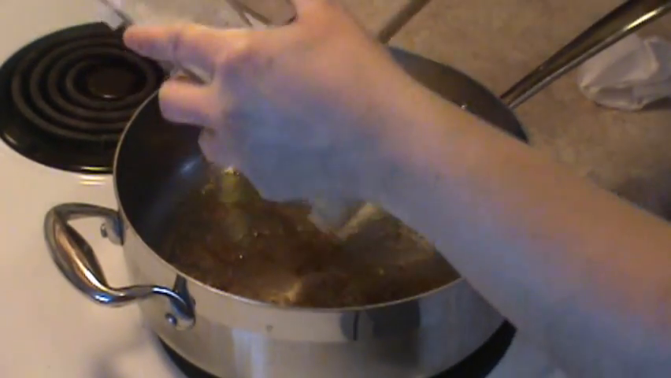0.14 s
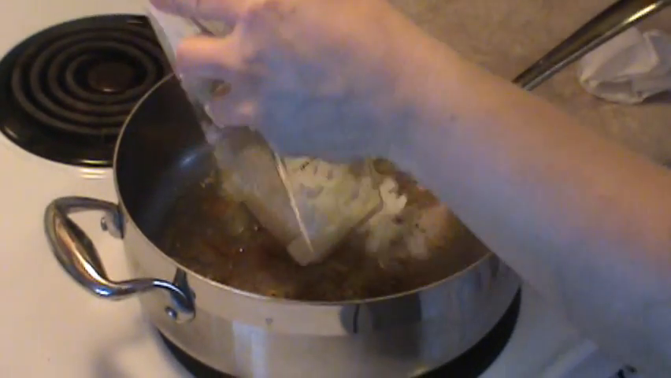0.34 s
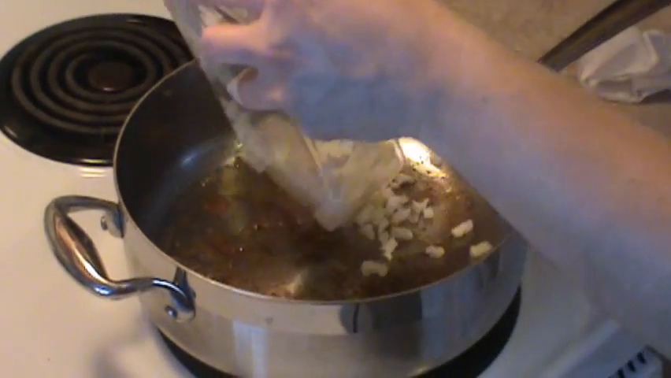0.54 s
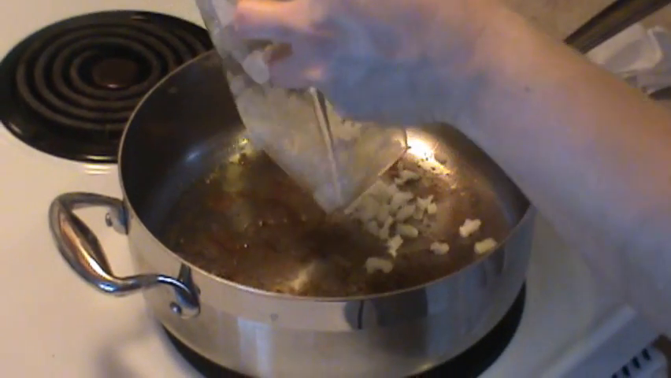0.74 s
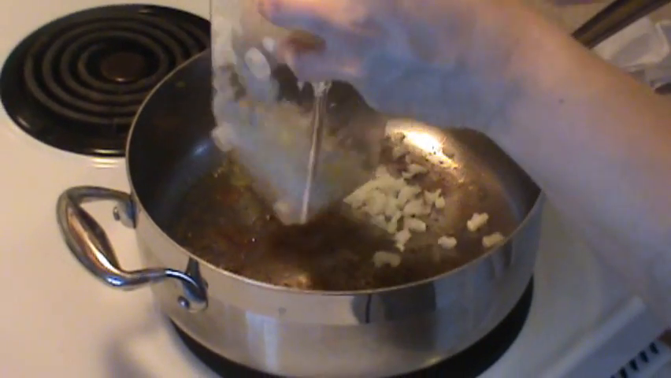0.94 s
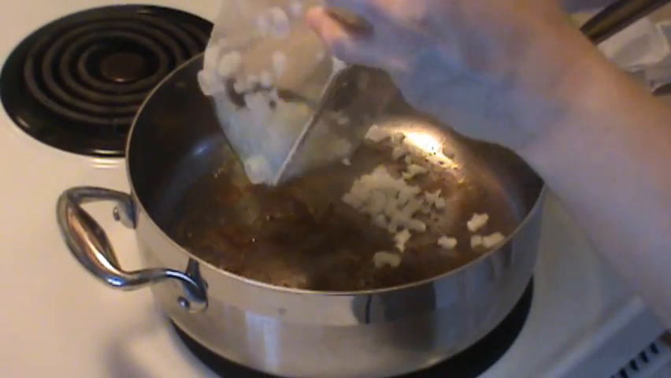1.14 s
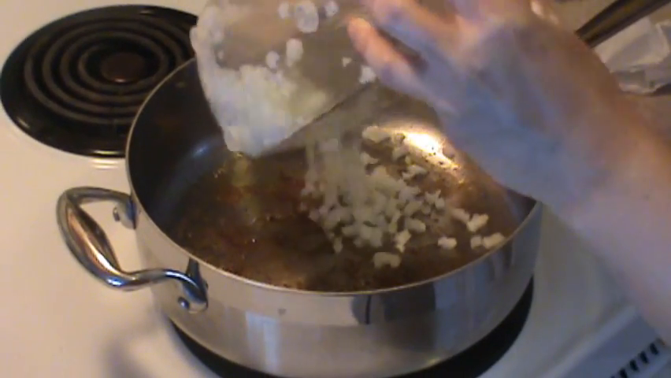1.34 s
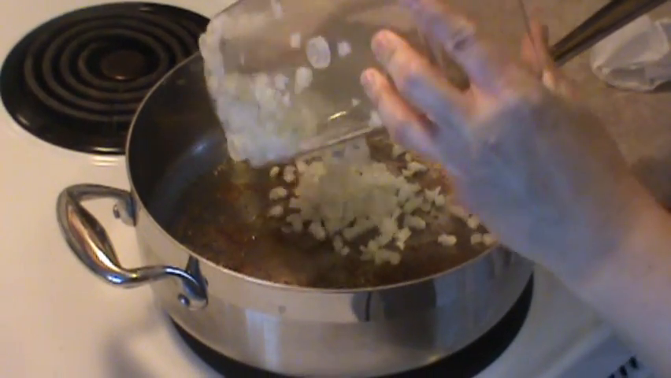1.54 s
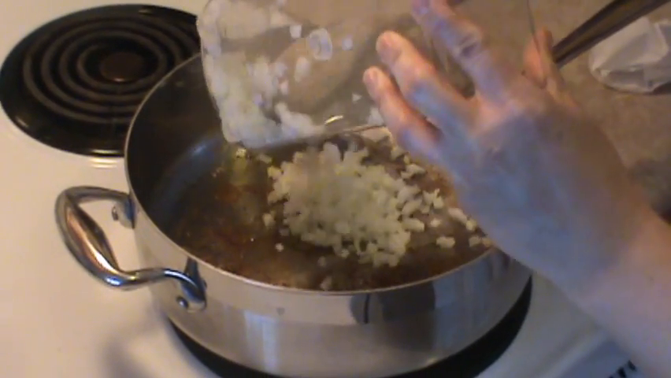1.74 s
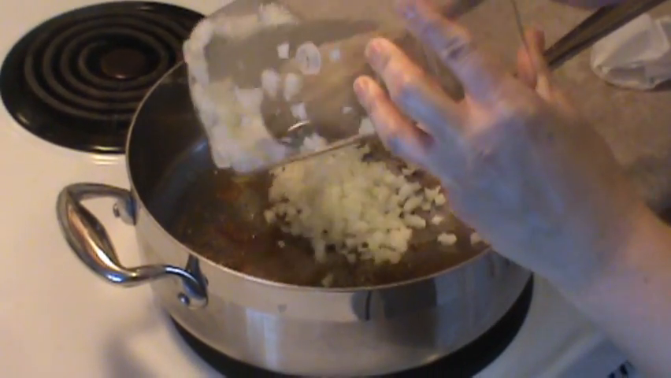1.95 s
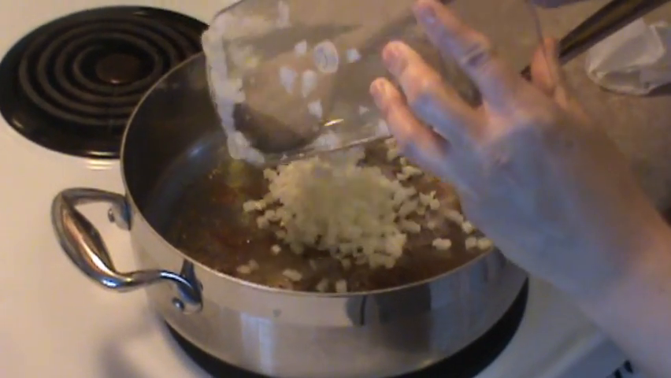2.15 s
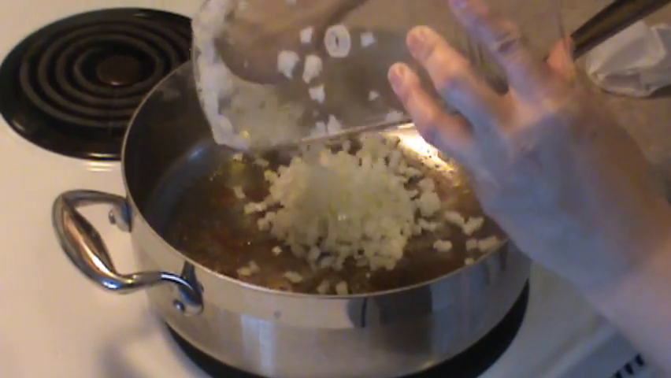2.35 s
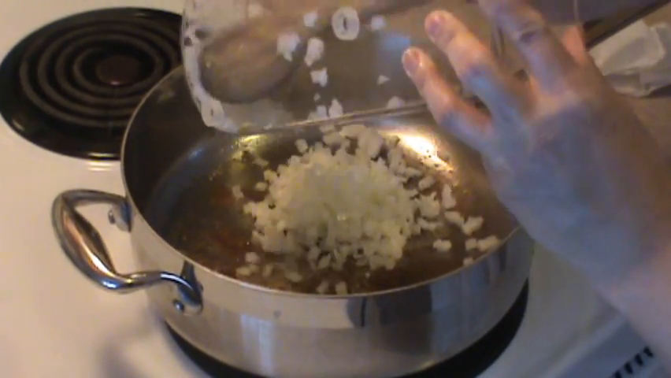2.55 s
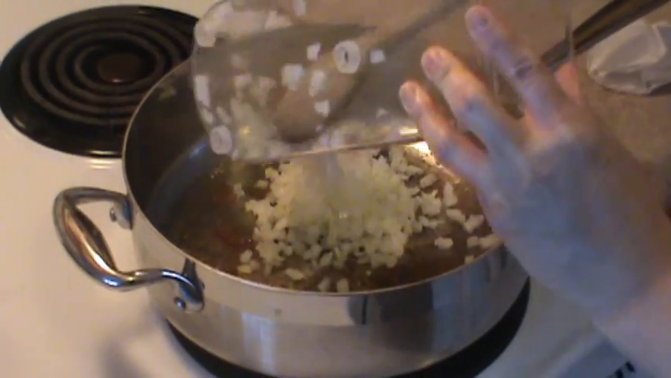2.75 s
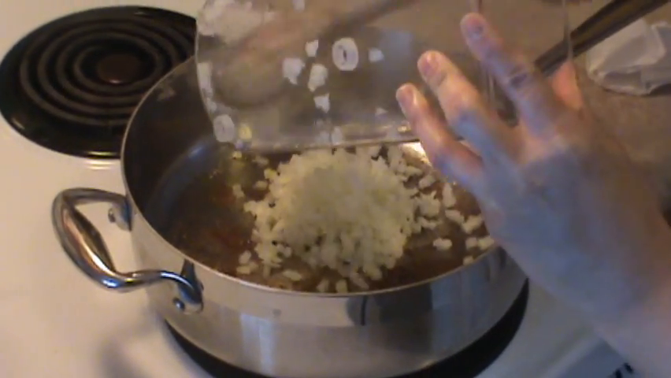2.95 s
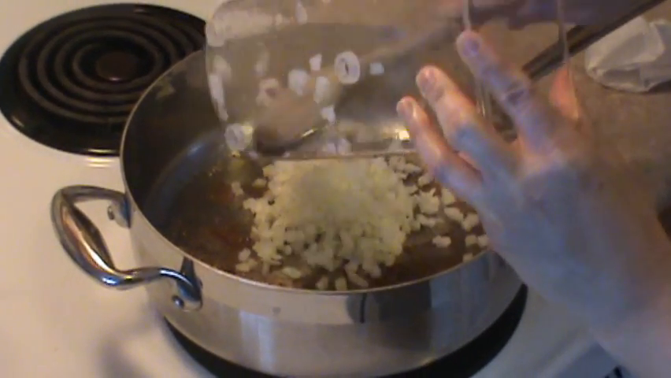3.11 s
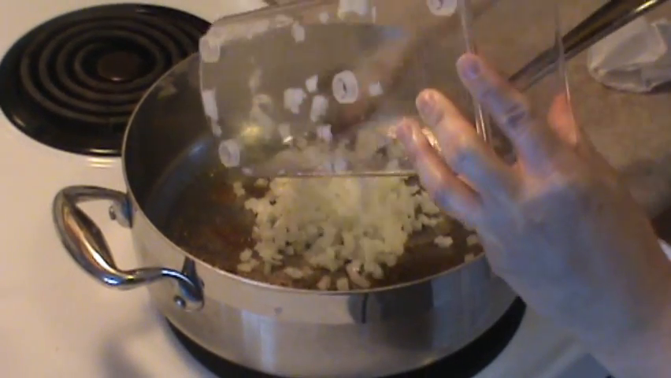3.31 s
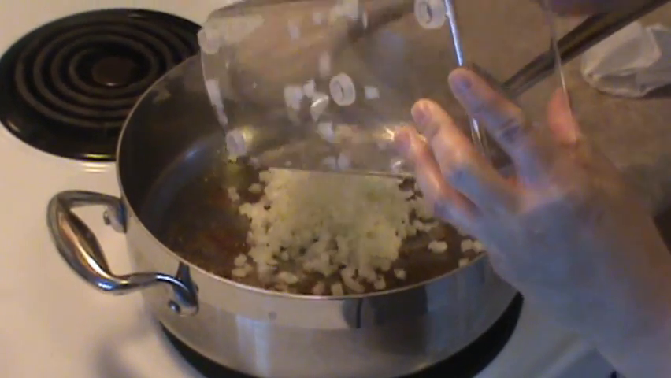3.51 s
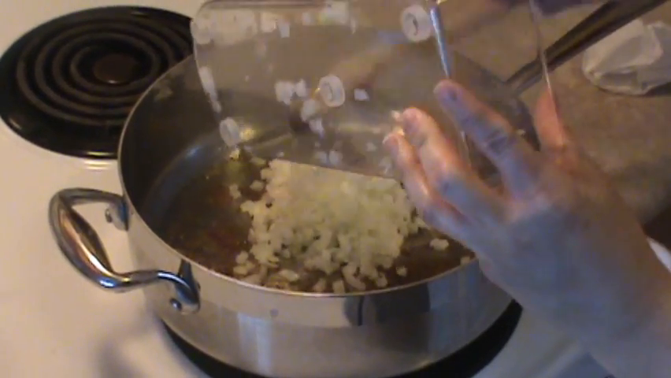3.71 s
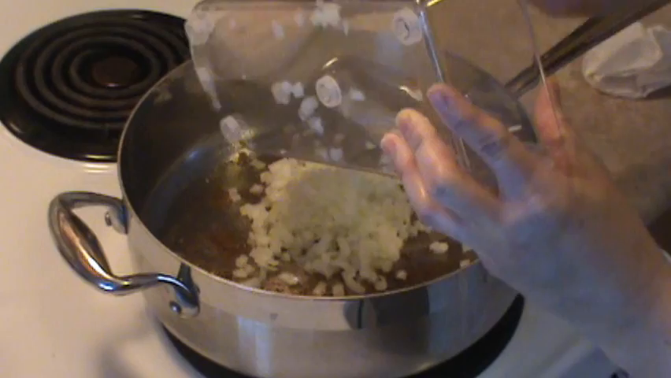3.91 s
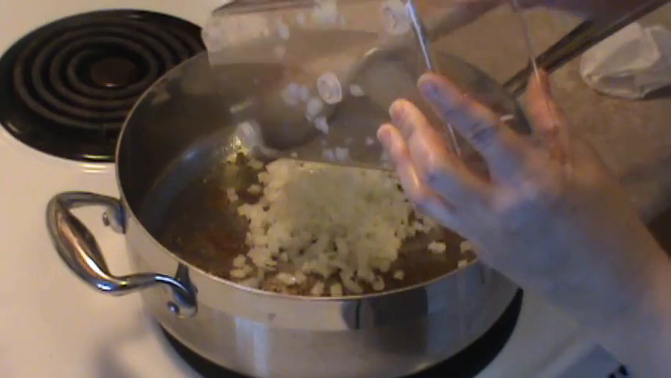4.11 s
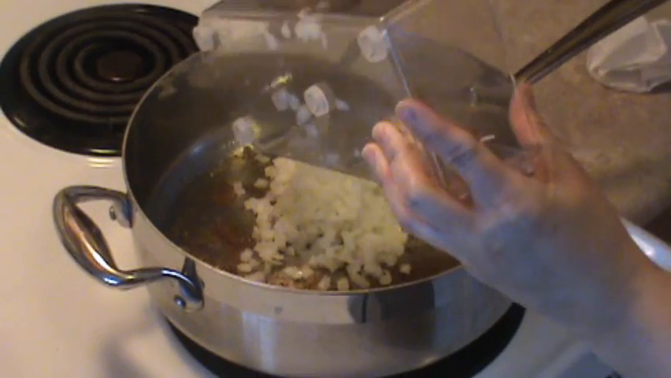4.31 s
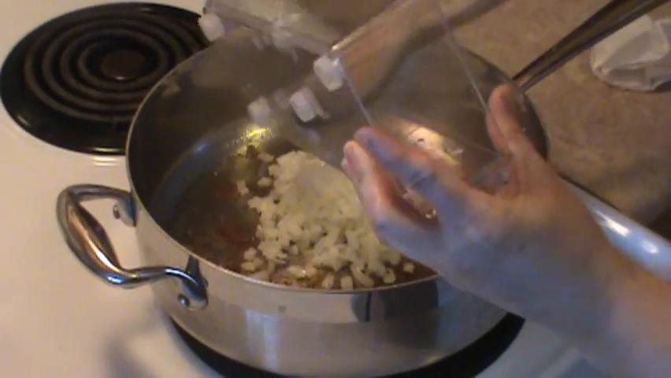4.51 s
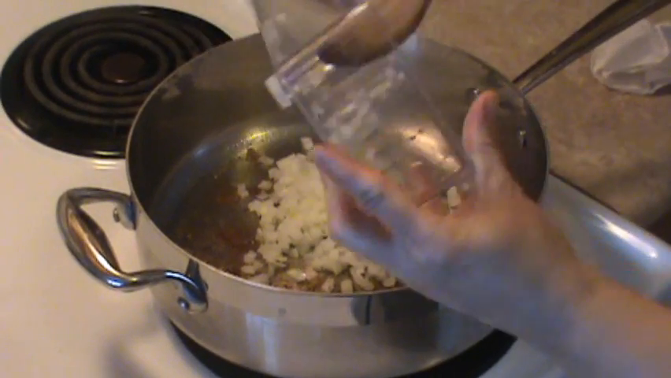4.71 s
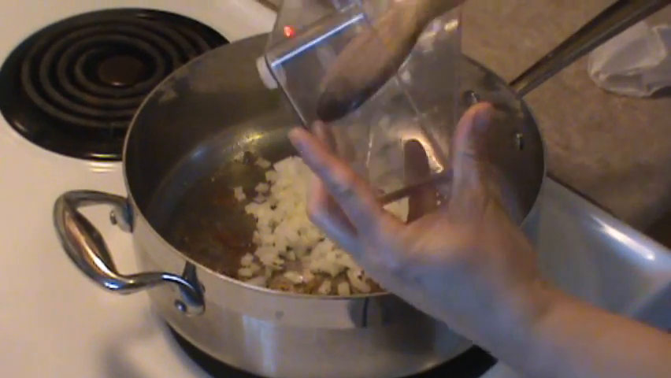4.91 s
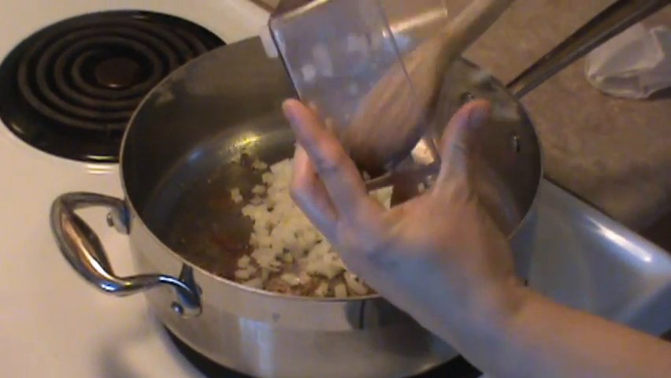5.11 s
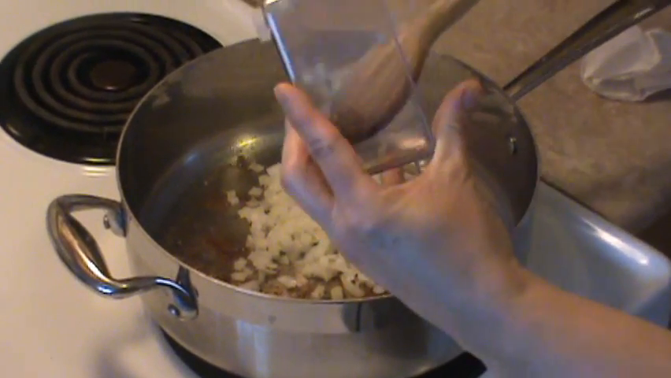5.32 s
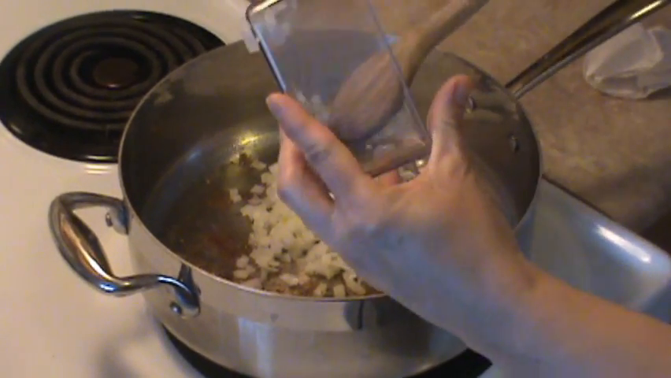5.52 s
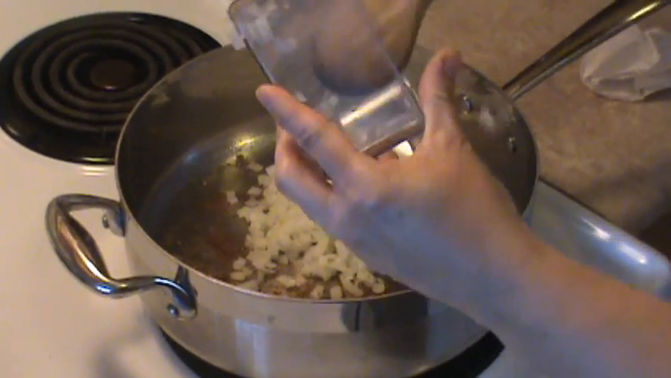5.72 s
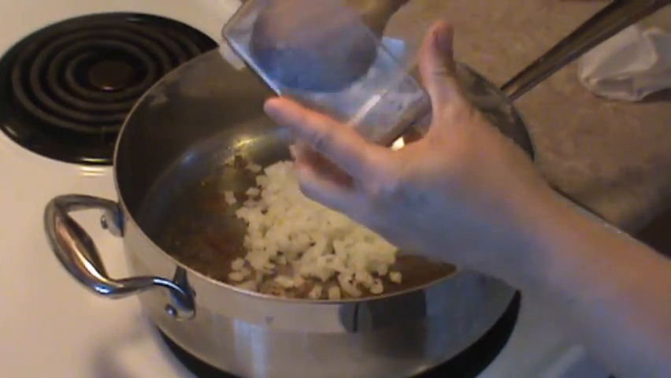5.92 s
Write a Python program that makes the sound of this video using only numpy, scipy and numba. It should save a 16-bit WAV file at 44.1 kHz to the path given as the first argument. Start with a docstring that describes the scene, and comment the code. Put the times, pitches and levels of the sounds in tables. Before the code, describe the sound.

A steady frying sizzle starts up in a steel pot, with hollow, irregular clacks of a wooden spoon in a plastic tub.

```python
"""Onions into hot oil

Chopped onions are scraped from a plastic tub into hot oil in a steel pot, in a small kitchen.
Countless steam bubbles burst into a steady sizzle, coloured by the air in the pot. A wooden spoon
knocks and rebounds in the tub, ringing its walls, with a few soft scrapes and a low room rumble.
A limiter ducks the sizzle under the loud knocks."""
import sys
import numpy as np
from scipy import signal
from scipy.fft import rfft, irfft
from scipy.io import wavfile
from scipy.ndimage import uniform_filter1d, minimum_filter1d
from numba import njit

SR = 44100
rng = np.random.default_rng(int(sys.argv[2]) if len(sys.argv) > 2 else 0)


def waveform_to_disk(signal):
    """Save audio, clipped to [-1, 1], as 16-bit WAV at the path in sys.argv[1]."""
    frames = np.transpose(np.atleast_2d(signal))
    scaled = np.clip(frames, -1, 1) * 32767
    samples = np.round(scaled).astype(np.int16)
    wavfile.write(sys.argv[1], SR, samples)


N = 267246
TIME = np.arange(N) / SR

# spectrum of the dry clack of wood on plastic: f/Hz, level/dB
CLACK_SPECTRUM = [(40, -58), (110, -20), (165, -10), (260, -14.5), (420, -6.5), (560, 0.5), (900, -1),
                  (1500, 1.5), (2400, -2), (4000, 5), (6000, 8), (9000, 1), (15000, -43)]


def undb(db):
    """Decibels to gain."""
    return 10 ** (np.asarray(db) / 20)


def unit(x):
    """Scale to rms 1."""
    return x / np.sqrt(np.mean(x ** 2))


def colour(x, points):
    """EQ through (f/Hz, level/dB) points; minimum phase keeps the attacks sharp."""
    hz, db = np.transpose(points)
    grid = np.fft.rfftfreq(4096, 1 / SR)
    curve_db = np.interp(np.log(grid + 1), np.log(hz), db)
    cepstrum = irfft(np.log(undb(curve_db)))
    cepstrum[1:len(grid) - 1] *= 2
    cepstrum[len(grid):] = 0
    impulse = irfft(np.exp(rfft(cepstrum)))
    return signal.fftconvolve(x, impulse)[:len(x)]


def wander(rate_hz):
    """Smooth random drift with a spread near 1."""
    step = int(SR / rate_hz)
    held = np.repeat(rng.standard_normal(N // step + 1), step)
    return uniform_filter1d(held, step)[:N]


def ring(t, hz, t60):
    """One damped mode."""
    return np.sin(2 * np.pi * hz * t) * undb(-60 * t / t60)


def bursts(per_s, spread_db, t60):
    """Random noise pops, most of them tiny and a few large, as mid and side."""
    happens = rng.random(N) < per_s / SR
    size = undb(spread_db * np.minimum(rng.exponential(size=N), 5))
    energy = signal.lfilter([1], [1, -undb(-120 / (t60 * SR))], happens * size ** 2)
    return unit(np.sqrt(energy) * rng.standard_normal((2, N)))


def stereo(mid, side, pan_db):
    """Mid and side to a narrow stereo image; a positive pan leans left."""
    # stereo width: f/Hz, side gain/dB
    width = [(40, -9), (75, -8.5), (140, -3), (260, -6.5), (500, -9), (1000, -10.5), (2200, -14.5),
             (4000, -14), (8000, -10.8), (12000, -9.2)]
    side = colour(side, width)
    return np.array([(mid + side) * undb(pan_db / 2), (mid - side) * undb(-pan_db / 2)])


def room_tone(level_db=-55):
    """The kitchen's low steady rumble and faint hiss."""
    # spectrum of the quiet kitchen: f/Hz, relative level/dB
    spectrum = [(25, -8), (50, -18), (66, 1), (82, 7), (100, -4), (125, -5.5), (200, -8), (500, -0.5),
                (1000, -0.5), (3000, -7), (7000, -15), (10000, -14), (15800, -21)]
    mid, side = (undb(level_db) * unit(colour(rng.standard_normal(N), spectrum)) for _ in range(2))
    return stereo(mid, side, pan_db=1)


def kitchen_echo(x, t60=0.48, build_s=0.0052, early_t60=0.09, early_db=3):
    """Quick reflections from pot and stove, then the kitchen's longer tail; new on every call."""
    t = TIME[:len(x)]
    fade = undb(-60 * t / t60) + undb(early_db - 60 * t / early_t60)
    tail = rng.standard_normal(len(t)) * fade * (1 - np.exp(-t / build_s))
    return signal.fftconvolve(x, tail / np.linalg.norm(tail))[:len(x)]


def scrapes(resonance_q=14, grit_db=-10):
    """Rubbing swells and fades; its tiny slips, softened by the oil, keep one resonance ringing."""
    # rubs of tub on pot and spoon in tub: centre t/s, half length/s, resonance f/Hz, level/dB
    rubs = [(0.346, 0.022, 585, -48.5), (0.362, 0.012, 2280, -46), (0.505, 0.036, 940, -46.5),
            (0.595, 0.044, 950, -50), (1.292, 0.075, 910, -49.5), (5.462, 0.022, 600, -50)]
    slips = bursts(per_s=2000, spread_db=2, t60=0.004)
    slips = signal.sosfilt(signal.butter(3, 3200, fs=SR, output="sos"), slips)
    grit = unit(np.array([colour(x, CLACK_SPECTRUM) for x in slips]))
    out = np.zeros((2, N))
    for centre_s, half_s, hz, db in rubs:
        tone = unit(signal.lfilter(*signal.iirpeak(hz, resonance_q, fs=SR), grit))
        swell = np.exp(-((TIME - centre_s) / half_s) ** 2)
        out += undb(db) * swell * (tone + undb(grit_db) * grit)
    return stereo(*out, pan_db=1)


def tub_hit(t, contact_hz, modes_db=-29, clack_db=-8, clack_t60=0.1, spot_db=2, flex=0.0169):
    """Wood clacks on plastic and rings the tub; a soft contact loses the treble."""
    # modes of the plastic tub: f/Hz, relative level/dB, t60/s
    tub_modes = [(392, -15.5, 0.029), (561.6, 1.5, 0.15), (617, 2, 0.11), (696, -4.5, 0.082),
                 (844, -10, 0.15), (908, 1.5, 0.21), (1097, 1, .14), (1185, -2, 0.14), (1366, -15, 0.038),
                 (1440, -26, 0.29), (1706, -1, 0.11), (1834, 1.5, 0.17), (2044, -7.5, 0.12),
                 (2134, 11, 0.061), (2379, 12.5, 0.04), (2460, -1, 0.13), (2546, 14.5, 0.042),
                 (3083, 3, 0.21)]
    # the spot struck decides how strongly, and which way, each mode is pushed; the grip bends its pitch
    spot = rng.standard_normal((len(tub_modes), 3))
    body = sum(np.sign(way) * undb(db + spot_db * push) * ring(t, hz * (1 + flex * bend), t60)
               for (hz, db, t60), (push, way, bend) in zip(tub_modes, spot))
    clack = colour(rng.standard_normal(len(t)) * undb(-60 * t / clack_t60), CLACK_SPECTRUM)
    softness = signal.butter(3, contact_hz, fs=SR, output="sos")
    return signal.sosfilt(softness, undb(modes_db) * body + undb(clack_db) * clack)


def wall_note(t, hz, t60=0.065, twin_ratio=1.05, twin_db=-5):
    """Opposite walls of the tub ring at slightly different pitches; the hand damps them quickly."""
    return ring(t, hz, t60) + undb(twin_db) * rng.standard_normal() * ring(t, hz * twin_ratio, t60)


def spoon_contacts(rebound_s=0.021, soften=0.81, note_lift_db=2):
    """Each stroke springs back once, in a softer contact that favours the next wall's note."""
    # spoon strokes: t/s, hit level/dB, contact cut-off f/Hz, wall note f/Hz, note level/dB,
    # rebound level against the stroke/dB, rebound note f/Hz
    strokes = [ (0, -12, 2560, 773, -11.5, -6, 1050), (0.6176, -3.5, 4600, 847, 4, -8, 862),
               (.667, -8.5, 2120, 550, 0, -21, 600), (1.352, -8.5, 5360, 1990, -6.5, -4.5, 2370),
               (1.444, -13.5, 1700, 587, -20, -18, 600), (1.9808, -5, 2420, 672, -4.5, -6, 794),
               (2.422, -3, 2820, 1230, -1, -1, 1263), (3.0195, -1, 2320, 1280, 1.5, -4, 880),
               (3.066, -2.5, 3100, 2072, -6, -12, 3040), (3.548, -5.5, 4180, 1243, -3.5, -3, 555),
               (3.991, -1, 3400, 1773, 0, -2, 910), (4.2576, -3.5, 3480, 1796, 1, -7.5, 930),
               (4.4474, -8.5, 2230, 1060, -11, -15, 596), (4.498, -.5, 2620, 671, 3.5, -2.5, 802),
               (5.0524, -3, 2030, 1060, -1.5, -5, 934), (5.186, -11, 905, 604, -10.5, -19, 890),
               (5.716, -2, 2600, 680, -3.5, -2, 880), (5.946, -10.5, 2670, 630, -7, -9.5, 1620)]
    for at_s, db, contact_hz, wall_hz, note_db, rebound_db, rebound_hz in strokes:
        yield at_s, db, contact_hz, wall_hz, note_db
        rebound_note_db = note_db + rebound_db + note_lift_db
        yield at_s + rebound_s, db + rebound_db, contact_hz * soften, rebound_hz, rebound_note_db


def spoon(wall_db=-13.5, rise_s=0.0011, turned_s=4.2, echo_mid_db=-3, echo_side_db=1):
    """The spoon knocks in the tub again and again, each hit with its wall note and its echo."""
    out = np.zeros((2, N + SR))
    t = TIME[:SR // 2]
    for at_s, db, contact_hz, wall_hz, note_db in spoon_contacts():
        knock = undb(db) * tub_hit(t, contact_hz) + undb(note_db + wall_db) * wall_note(t, wall_hz)
        knock *= 1 - np.exp(-t / rise_s)  # the wall gives way gradually
        # the small tub radiates no deep bass, and less still once it is turned away from the pot
        low_cut_hz = 125 if at_s < turned_s else 260
        knock = signal.sosfilt(signal.butter(2, low_cut_hz, "high", fs=SR, output="sos"), knock)
        mid = knock + undb(echo_mid_db) * kitchen_echo(knock)
        side = undb(echo_side_db) * kitchen_echo(knock)
        start = int(at_s * SR)
        out[:, start:start + len(t)] += [mid, side]
    return stereo(*out[:, :N], pan_db=1)


def pot(pops, covered_s=1.7):
    """The pot rings with the pops, most freely before the heap of onions covers its floor."""
    # resonances of the pot: f/Hz, bandwidth/Hz, nominal lift/dB
    resonances = [(570, 50, 4.5), (655, 35, 5), (935, 40, 4.5), (1105, 70, 5), (1620, 70, 3),
                  (1970, 90, 4.5), (2400, 50, 2.5), (2620, 55, 6), (3185, 75, 5), (4075, 50, 3.5),
                  (5750, 80, 2)]
    # spectrum of bursting bubbles: f/Hz, relative level/dB
    bubble_spectrum = [(200, -33.5), (500, -23), (900, -18.5), (1350, -19), (1700, -15.5), (2300, -11),
                       (3200, -8), (4200, -3), (5600, 0.5), (7300, -4), (9000, 0), (10700, 1), (12500, -2),
                       (15800, -11.5)]
    ringing = sum((undb(db) - 1) * signal.lfilter(*signal.iirpeak(hz, hz / width, fs=SR), pops)
                  for hz, width, db in resonances)
    openness = undb(6.5 / (1 + (TIME / covered_s) ** 8) - 0.5)
    return unit(colour(pops + openness * ringing, bubble_spectrum))


def boiling(big_at_1s_db=-2, db_per_doubling=2.15):
    """Loads flare up and dry out while bubbles grow: the sizzle's envelope and big-bubble gain in dB."""
    # onions landing in the oil: t/s, sizzle level/dB, time to spread/s, drying fade/(dB/s)
    loads = [(.433, -40.5, 0.0076, 3), (0.479, -28.5, 0.024, 1), (1.39, -24.5, 0.11, 0.78)]
    power = 0
    for at_s, db, spread_s, fade_db_per_s in loads:
        age = np.maximum(TIME - at_s, 0)
        flare = 1 - np.exp(-age / spread_s)
        power += (undb(db - fade_db_per_s * age) * flare) ** 2
    in_oil_s = np.maximum(TIME - loads[0][0], 0.05)
    return np.sqrt(power), big_at_1s_db + db_per_doubling * np.log2(in_oil_s)


def sizzle(big_below_hz=4500, flicker_db=0.22, flutter_db=0.9, spits_db=-23):
    """Water from the onions boils in the oil: a dense fizz and lone spits, fuller as the heap warms."""
    envelope, big_db = boiling()
    fizz = bursts(per_s=14000, spread_db=1.9, t60=0.0035)
    spits = undb(spits_db) * bursts(per_s=300, spread_db=2.2, t60=0.0015)
    bubbles = np.array([pot(pops) for pops in fizz + spits])
    big = signal.sosfiltfilt(signal.butter(2, big_below_hz, fs=SR, output="sos"), bubbles)
    # small and big bubbles come in their own flurries
    small = (bubbles - big) * undb(flicker_db * wander(rate_hz=35))
    big = big * undb(big_db + flutter_db * wander(rate_hz=25))
    return stereo(*((small + big) * envelope), pan_db=-0.03)


def scene():
    """The sizzle up front, with spoon knocks, scrapes and room tone around it."""
    return sizzle() + spoon() + scrapes() + room_tone()


@njit
def follow(x, attack, release):
    """Envelope follower with separate rates for rising and falling."""
    out, level = np.empty(len(x)), 0.
    for i in range(len(x)):
        level += (x[i] - level) * (attack if x[i] > level else release)
        out[i] = level
    return out


def record(dry, limit_db=-17, attack_s=0.0012, release_s=0.015, top_hz=15750):
    """A look-ahead limiter ducks the mix at loud moments; a steep low-pass cuts the top."""
    envelope = follow(np.abs(dry).max(axis=0), 1 / (attack_s * SR), 1 / (release_s * SR))
    gain = np.minimum(1, undb(limit_db) / (envelope + 1e-9))
    gain = uniform_filter1d(minimum_filter1d(gain, size=200), size=130)  # eases down ahead of a peak
    high_cut = signal.ellip(14, 0.1, 80, top_hz, fs=SR, output="sos")
    return signal.sosfilt(high_cut, dry * gain)


dry = scene()
out = record(dry)
waveform_to_disk(out)
```